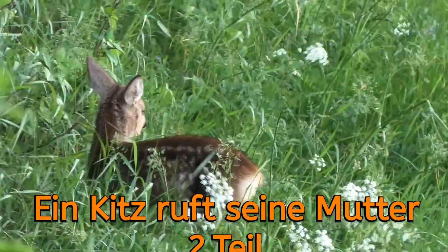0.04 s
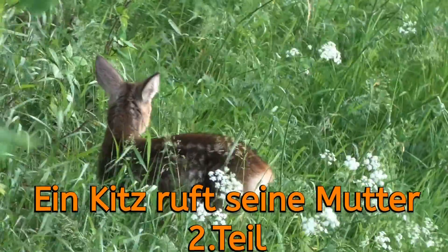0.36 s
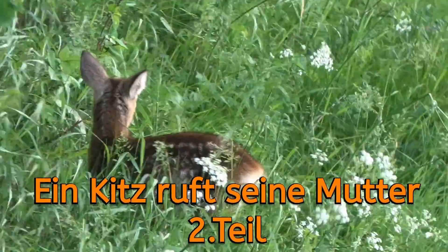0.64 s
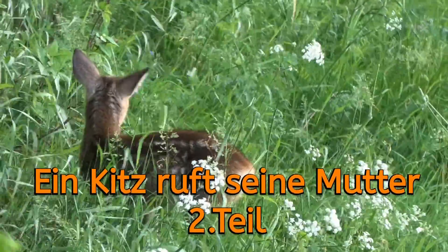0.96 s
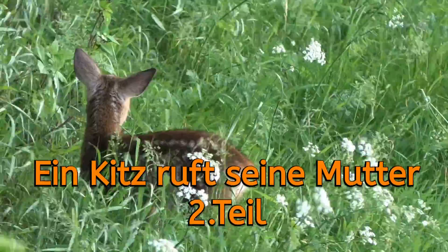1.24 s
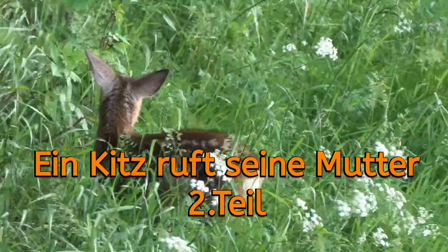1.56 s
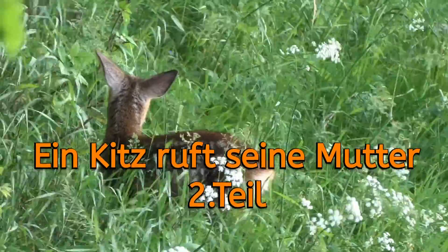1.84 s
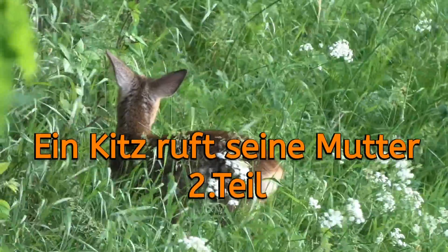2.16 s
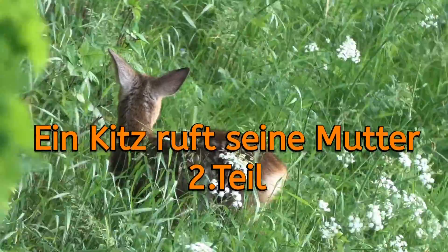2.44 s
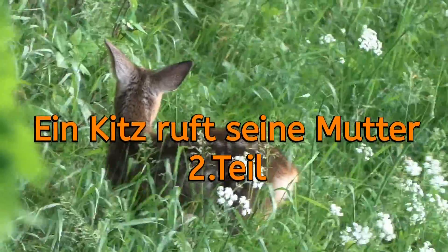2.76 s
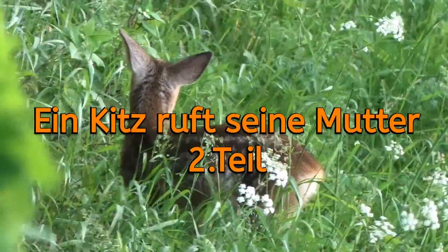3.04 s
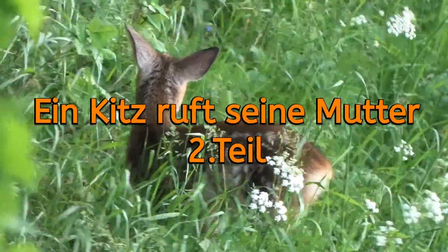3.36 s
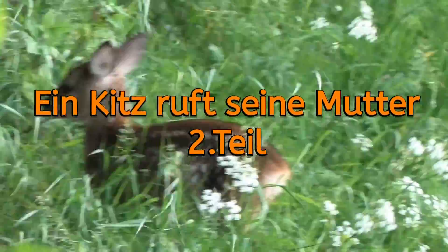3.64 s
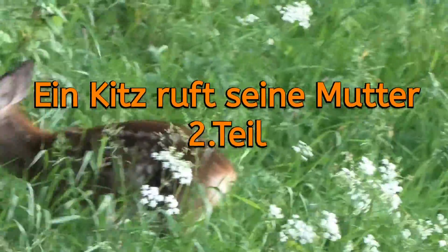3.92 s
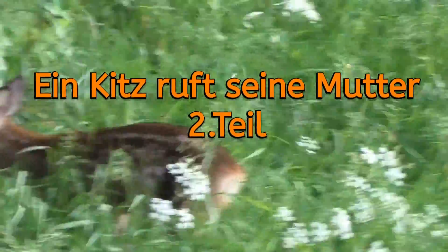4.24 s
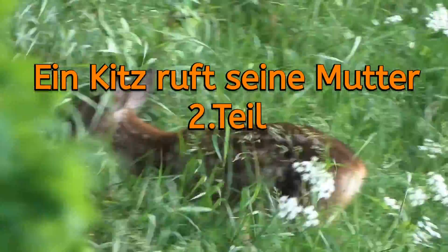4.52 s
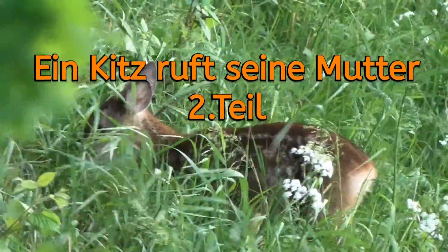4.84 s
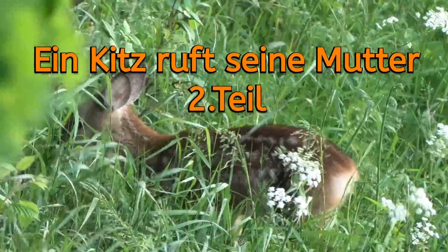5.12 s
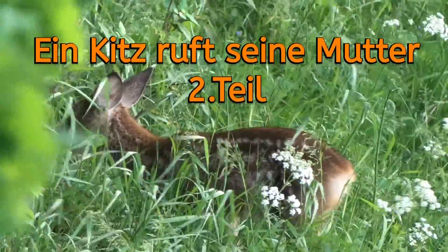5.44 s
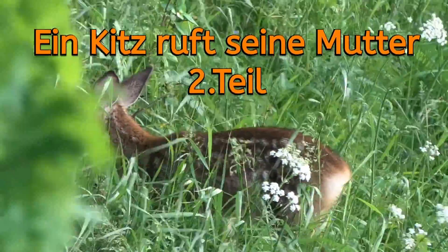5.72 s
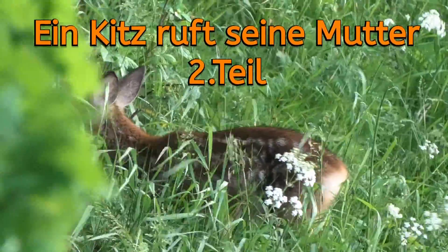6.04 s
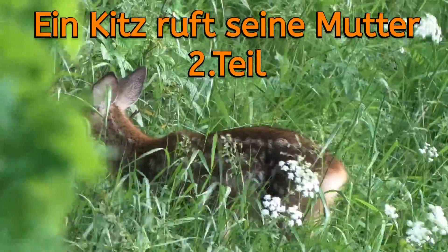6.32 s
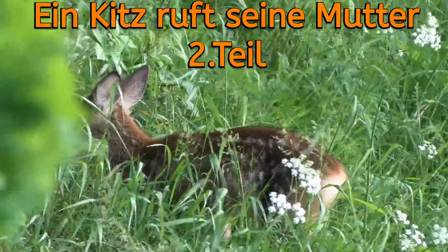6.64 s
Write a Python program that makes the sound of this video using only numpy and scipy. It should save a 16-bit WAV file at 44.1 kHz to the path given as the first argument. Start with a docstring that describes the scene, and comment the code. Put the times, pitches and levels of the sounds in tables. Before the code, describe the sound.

Songbirds whistle quick sweeping notes outdoors, growing busier midway, before a distant fluting bird and a cuckoo call from the woods.

```python
"""Small birds whistle at the edge of a summer meadow, their sweeping notes scattered by the foliage.
From the start light wind buffets the microphone and a camera ticks faintly; later comes one dry click.
Midway a distant chorus swells, quick twitters and near scooping notes begin, and a fawn brushes the grass.
Near the end a fluting bird and a cuckoo call from deep in the wood, which reverberates after them."""
import sys
import numpy as np
from scipy import signal
from scipy.fft import rfft, irfft, next_fast_len
from scipy.io import wavfile
from scipy.ndimage import uniform_filter1d, map_coordinates

SR = 44100
rng = np.random.default_rng(int(sys.argv[2]) if len(sys.argv) > 2 else 0)


def file_out(sig):
    """Save sig as 16-bit WAV at sys.argv[1]."""
    # one column per channel
    cols = np.atleast_2d(sig).T
    # limit, then scale
    lim = np.clip(cols, -1, 1)
    pcm = np.round(lim * 32767).astype(np.int16)
    wavfile.write(sys.argv[1], SR, pcm)


N = 298998
TIME = np.arange(N) / SR

# spectra of camera hiss, distant air, wind on the microphone and far birds: f/Hz, relative level/dB
HISS_SPECTRUM = [(800, 5.5), (2000, 2.5), (5000, -4.5), (8000, -7), (11000, -2.5), (15500, 0.5)]
AIR_SPECTRUM = [(15, -35), (25, -32), (65, -8.5), (99, -2.5), (130, -5.5), (218, -11.5), (413, -7),
                (515, -12.5), (785, -16), (1460, -27.5), (2000, -37.5), (2600, -35.5), (4400, -120)]
BUFFET_SPECTRUM = [(15, -9), (40, 2.5), (90, 3), (150, -10.5), (300, -34.5), (700, -66)]
CHORUS_SPECTRUM = [(1120, -48.5), (1900, -21), (2310, -6.5), (2650, -4), (2910, -1), (3180, 4.5), (3580, 2),
                   (4170, -4), (4920, 0.5), (5840, -11), (7800, -27.5), (10100, -37), (17200, -120)]
# impacts in the camera: t/s, relative tick level/dB, relative thud level/dB
CAMERA_TICKS = [(0.624, -49, -67.5), (1.512, -49.5, -67), (2.41, -55, -64), (3.289, -44.5, -63.5),
                (4.185, -46, -59), (5.0776, -52, -57), (5.9697, -44.5, -64)]
# a dry click: t/s, level/dB
DRY_CLICK = [(2.4542, -39)]
# puffs of wind: t/s, half width/s, relative level/dB
WIND_PUFFS = [(.35, 0.034, -67), (.67, .04, -71), (1.28, 0.14, -57), (2.24, 0.1, -56.5), (5.01, 0.027, -67),
              (6.1, .02, -56)]
# envelopes of the fawn's step and of the far birds: t/s, relative level/dB
STEP_ENVELOPE = [(3.55, -74.5), (3.68, -62.5), (3.77, -63.5), (3.86, -66), (3.95, -74.5)]
CHORUS_ENVELOPE = [(0, -65.5), (1.3, -73.5), (2.1, -64.5), (2.6, -65), (3.1, -57.5), (4.2, -52.5),
                   (5.3, -50), (6, -51), (6.4, -67.5), (6.78, -69)]
# reflections from nearby trunks: delay/s, relative level/dB
TRUNK_ECHOES = [(.0085, -10.5), (.021, -14)]
# contours of the cuckoo's two hoots and the fluting bird's drop and slide: t/s, f/Hz, level/dB
HIGH_HOOT = [(5.75, 725, -71), (5.79, 687.5, -56), (5.845, 679.5, -55.5), (5.88, 684, -77)]
LOW_HOOT = [(6.03, 604.6, -67), (6.07, 580.3, -50.5), (6.12, 552.6, -47.5), (6.17, 548.3, -47.5),
            (6.2, 529, -67)]
FLUTED_DROP = [(5.725, 2230, -62), (5.78, 1423, -47.5), (5.8, 1390, -75)]
FLUTED_SLIDE = [(5.95, 2156, -59.5), (6.01, 1810, -44), (6.08, 1701, -48), (6.14, 1602, -50.5),
                (6.185, 1469, -40), (6.27, 1108, -57), (6.3, 1040, -76)]
# far warbles: t/s, length/s, start f/Hz, end f/Hz, relative level/dB
WARBLE_NOTES = [(0, 0.83, 4720, 5300, -73.5), (0.93, 0.077, 3654, 2917, -49.5),
                (1.076, 0.089, 4860, 5130, -59), (1.258, 0.13, 6050, 6350, -67),
                (1.362, 0.053, 6850, 6630, -57.5), (1.752, 0.088, 4590, 4480, -58.5),
                (2.113, .14, 2290, 2205, -69.5), (2.121, 0.25, 5420, 5550, -68.5),
                (5.891, 0.07, 2316, 2304, -53.5)]
# one bird's evenly repeated falling warble, in the same columns
WARBLE_SERIES = [(4.338 + k * 0.157, 0.08, 3400, 2564, -49) for k in range(6)]
# twitters: t/s, nominal top f/Hz, relative level/dB
TWITTER_NOTES = [(3.672, 5220, -51.5), (3.735, 5170, -51), (3.785, 5200, -49), (3.86, 5110, -46),
                 (3.902, 5100, -46), (3.985, 5030, -47.5), (4.045, 5050, -46), (4.172, 5160, -42),
                 (4.218, 5700, -43.5), (4.282, 5130, -45), (4.46, 4990, -46), (4.618, 5200, -46),
                 (4.772, 5200, -44), (4.908, 5250, -43), (4.936, 5200, -48.5), (5.094, 5200, -48),
                 (5.24, 5080, -52), (5.572, 6400, -47), (5.598, 6120, -50), (5.65, 6410, -50),
                 (6.633, 5300, -50.5)]
# arched or dipped whistles: t/s, length/s, middle f/Hz, f/Hz at both ends, level/dB
BOW_NOTES = [(2.541, 0.12, 2869, 2515, -44.5), (2.929, 0.093, 3786, 3690, -49),
             (3.738, 0.092, 2810, 2675, -56), (4.006, 0.072, 4980, 4750, -56),
             (5.262, 0.098, 2260, 2610, -56), (5.412, 0.079, 2190, 2490, -55),
             (6.122, 0.1, 2760, 2860, -60.5), (6.493, 0.082, 2822, 2710, -67)]
# rising calls: t/s, length/s, top f/Hz, time of the leap/length, level/dB
RISE_NOTES = [(0.188, 0.039, 3260, 0.6, -57.5), (0.504, 0.1, 3220, 0.58, -58.5),
              (3.293, .118, 3090, .38, -43.5), (3.505, 0.11, 3223, 0.41, -44.5)]
# falling slurs: t/s, length/s, start f/Hz, final f/Hz, glide time/s, level/dB, scattered energy share
SLUR_NOTES = [(0.779, 0.039, 3790, 2820, 0.035, -46.5, 0.53), (0.929, 0.097, 3925, 3098, 0.042, -45, 0.26),
              (1.574, .12, 4410, 3350, 0.031, -45, 0.41), (1.908, 0.11, 4410, 3285, 0.043, -45, 0.42),
              (2.241, 0.094, 3390, 3161, 0.047, -45, 0.47), (2.37, 0.084, 6100, 4380, 0.021, -56, 0.74),
              (2.395, 0.082, 3390, 3243, 0.019, -43.5, 0.3), (2.7, 0.043, 6450, 4680, 0.033, -60.5, 0.8),
              (2.764, .132, 4900, 3493, .014, -44, 0.4), (2.978, 0.089, 3945, 3030, 0.0082, -45, 0.24),
              (3.174, 0.038, 4140, 4190, .011, -46, .4), (3.596, 0.084, 5660, 5200, 0.037, -54, 0.54),
              (6.037, 0.06, 4840, 4800, 0.026, -58, .4), (6.145, .067, 4910, 4740, 0.021, -53.5, 0.5),
              (6.283, 0.063, 5000, 4760, 0.0295, -54, .45), (6.42, 0.066, 4990, 4700, 0.0454, -60, .5)]
# two-step plunges: t/s, length/s, frequency ratio, level/dB
PLUNGE_NOTES = [(3.122, 0.053, .93, -46.5), (4.452, 0.18, 0.99, -41), (5.834, .17, 0.97, -41.5),
                (6.19, 0.155, 1.0, -43.5)]
# their common contour: t/s from the onset, nominal f/Hz, relative level/dB, scattered energy share
PLUNGE_CONTOUR = [(0, 7000, -6.5, 0.7), (.013, 5874, -1, 0.76), (.035, 5435, -0.5, 0.58),
                  (.046, 3953, 2.5, 0.25), (.06, 3228, -8.5, 0.36), (0.123, 3280, -13.5, .3),
                  (.152, 4290, -1, 0.25), (.17, 4220, -13, 0)]
# the near bird's scoops: t/s, length/s, held f/Hz, end f/Hz, glide time/s, level/dB, scattered share
SCOOP_NOTES = [(3.472, .072, 4645, 4430, .01, -42, 0.31), (3.815, .088, 4070, 4450, 0.0085, -34.5, 0.08),
               (4.109, .078, 4550, 4500, 0.012, -38, 0.15), (4.819, 0.086, 4070, 4340, 0.011, -35.5, 0.08),
               (5.165, 0.094, 3674, 4180, .013, -41, 0.06), (5.495, 0.075, 4596, 4390, .014, -42, 0.25),
               (6.538, .094, 4050, 4580, .011, -35.5, 0.09)]


def amp(db):
    """Amplitude grows tenfold for every 20 dB."""
    return 10 ** (np.asarray(db) / 20)


def unit(x):
    """Normalisation to rms 1."""
    return x / np.sqrt(np.mean(x ** 2) + 1e-20)


def clock(length):
    """Sampled time in seconds from the onset of a sound."""
    return np.arange(int(length * SR)) / SR


def curves(rows):
    """Linear interpolation of each column over the time in the first."""
    times, *columns = np.transpose(rows)
    return [np.interp(TIME, times, column) for column in columns]


def wobble(rate, size=N):
    """Smooth random fluctuation through `rate` Gaussian values a second."""
    return map_coordinates(rng.standard_normal(int(size * rate / SR) + 4), [np.arange(size) * rate / SR])


def noise(spectrum):
    """Spectral shaping of white noise by (f/Hz, level/dB) points, at rms 1."""
    size = next_fast_len(N + 8192)
    hz, db = np.transpose(spectrum)
    gain = amp(np.interp(np.log(np.fft.rfftfreq(size, 1 / SR) + 1), np.log(hz), db))
    return unit(irfft(rfft(rng.standard_normal(size)) * gain, size)[:N])


def add(track, onset, sound):
    """Superposition of a sound on a track, from an onset in seconds."""
    part = track[max(round(onset * SR), 0):][:len(sound)]
    part += sound[:len(part)]


def whistle(hz, waver, flutter_db):
    """A sinusoid under random frequency and amplitude modulation; phase is the integral of frequency."""
    phase = 2 * np.pi * np.cumsum(hz * (1 + waver * wobble(170, len(hz)))) / SR
    return np.sqrt(2) * np.sin(phase) * amp(flutter_db * wobble(82.8, len(hz)))


def swell(size, crest, sharpness):
    """The envelope of one push of air, peaking at `crest`, a share of the length."""
    progress = np.interp(np.linspace(0, 1, size), [0, crest, 1], [0, .5, 1])
    return np.abs(np.sin(np.pi * progress)) ** sharpness


def reflected(x):
    """Interference: delayed reflections from trunks beat against a gliding direct tone."""
    out = x.copy()
    for delay, db in TRUNK_ECHOES:
        add(out, delay, amp(db) * x)
    return out


def scattered(x, early_t60, late_t60, late_db):
    """Multiple scattering: leaves give a fast decay, trunks a slower one (60 dB times in seconds)."""
    t = clock(1)
    decay = amp(-60 * t / early_t60) + amp(late_db - 60 * t / late_t60)
    decay *= 1 - np.exp(-t / 0.0023)
    decay /= np.sqrt(np.sum(decay ** 2))
    out, hop = np.zeros(N), SR // 8
    padded, window = np.pad(x, (0, 2 * hop)), np.hanning(2 * hop)
    for start in range(0, N, hop):
        piece = padded[start:start + 2 * hop] * window
        paths = rng.standard_normal(SR)  # the paths change as the foliage moves
        if piece.any():
            add(out, start / SR, signal.fftconvolve(piece, decay * paths))
    return out


def camera():
    """Damped impacts: over a steady hiss, each tick of the mechanism excites a thud in the housing."""
    ticks, thuds, t = np.zeros(N), np.zeros(N), clock(0.2)
    for onset, tick_db, thud_db in CAMERA_TICKS:
        add(ticks, onset, amp(tick_db - 9 - 60 * t / 0.019))
        add(thuds, onset, amp(thud_db + 7 - 60 * t / 0.14) * (1 - np.exp(-t / 0.0055)))
    ticks *= noise([(2000, -7), (8000, -5), (15000, -1)])
    thuds *= noise([(50, -7), (160, 2.5), (350, -1.5), (700, -21), (2000, -53)])
    return amp(-72.5) * noise(HISS_SPECTRUM) + ticks + thuds


def wind():
    """Turbulent pressure: a dying breeze and a few puffs buffet the microphone, over distant air."""
    breeze = amp(-74.5 - 1.33 * TIME)
    puffs = sum(amp(db) * np.exp(-((TIME - peak) / width) ** 2) for peak, width, db in WIND_PUFFS)
    buffets = (breeze + puffs) * amp(-0.5 + 4.1 * wobble(21.96)) * noise(BUFFET_SPECTRUM)
    return buffets + amp(-69.5) * noise(AIR_SPECTRUM)


def fawn_step():
    """Friction: blades of grass brushed by a fawn give a brief swell of high noise."""
    level_db, = curves(STEP_ENVELOPE)
    blades = noise([(1500, -9.5), (5000, 3.5), (9000, -6.5), (15000, -23)])
    return amp(level_db + wobble(120)) * blades


def click():
    """A heavily damped transient: noise that dies away without ringing."""
    envelope = np.zeros(N)
    for onset, db in DRY_CLICK:
        add(envelope, onset, amp(db - 60 * clock(0.05) / 0.014))
    return envelope * noise([(300, -2), (1200, -25), (3500, 13), (5500, -15), (15000, -37)])


def chorus():
    """Incoherent summation: many far songs blur into a flickering band of noise."""
    level_db, = curves(CHORUS_ENVELOPE)
    spectrogram = signal.stft(noise(CHORUS_SPECTRUM), nperseg=512)[2]
    patches = uniform_filter1d(rng.standard_normal(spectrogram.shape), size=4, axis=0)  # in frequency
    patches = unit(uniform_filter1d(patches, size=10, axis=1))  # in time
    blur = signal.istft(spectrogram * amp(5.04 * patches), nperseg=512)[1][:N]
    return amp(level_db - 5) * unit(blur)


def wood_call(contour, share, waver, t60):
    """Reverberation: a share of a pure call's energy arrives diffusely through the trees."""
    hz, level_db = curves(contour)
    sounding = (TIME > contour[0][0]) & (TIME < contour[-1][0])
    call = sounding * amp(level_db) * whistle(uniform_filter1d(hz, size=600), waver, flutter_db=3.5)
    diffuse = scattered(call, early_t60=0.84, late_t60=t60, late_db=4)
    return np.sqrt(1 - share) * call + np.sqrt(share) * diffuse


def cuckoo(echo_s=0.19, echo_db=-4):
    """Echo: a soft high hoot returns from the trees before the stronger low hoot."""
    high = wood_call(HIGH_HOOT, share=0.53, waver=0.0148, t60=2.3)
    call = high + wood_call(LOW_HOOT, share=0.099, waver=0.0055, t60=2.6)
    add(call, echo_s, amp(echo_db) * high)
    return call


def fluting_bird():
    """Two falling glides from so deep in the wood that reverberation carries much of their energy."""
    drop = wood_call(FLUTED_DROP, share=0.78, waver=0.0095, t60=1.6)
    return drop + wood_call(FLUTED_SLIDE, share=0.51, waver=0.0088, t60=1.09)


def warblers(shake_hz=95, depth=0.047):
    """Frequency modulation: the pitch of each far note shakes rapidly about a straight glide."""
    song = np.zeros(N)
    for onset, length, start_hz, end_hz, db in WARBLE_NOTES + WARBLE_SERIES:
        size = int(length * SR)
        shake = np.sin(2 * np.pi * np.cumsum(shake_hz * (1 + 0.31 * wobble(60, size))) / SR)
        hz = np.linspace(start_hz, end_hz, size) * (1 + depth * shake)
        tone = whistle(hz, waver=0.015, flutter_db=2)
        add(song, onset, amp(db) * swell(size, crest=0.14, sharpness=0.72) * tone)
    return amp(-3.5) * song + amp(-1) * scattered(song, early_t60=0.75, late_t60=1, late_db=-1)


def twitterer(length_s=0.033, top_s=0.00828, width_s=0.011, foot_ratio=0.67):
    """A train of short tone pulses, each a Gaussian arch in frequency, slightly detuned at random."""
    song, t = np.zeros(N), clock(length_s)
    arch = foot_ratio + (1 - foot_ratio) * np.exp(-((t - top_s) / width_s) ** 2)
    for onset, top_hz, db in TWITTER_NOTES:
        detuning = 1 + 0.0221 * rng.standard_normal()
        tone = whistle(top_hz * arch * detuning, waver=0.016, flutter_db=0)
        add(song, onset, amp(db) * swell(len(t), crest=0.71, sharpness=1.65) * tone)
    return amp(-1) * reflected(song) + amp(2.5) * scattered(song, early_t60=0.29, late_t60=1.5, late_db=-8.5)


def bows(share=0.29):
    """Parabolic sweep: the frequency leaves its starting value and returns to it."""
    for onset, length, middle_hz, ends_hz, db in BOW_NOTES:
        parabola = (2 * clock(length) / length - 1) ** 2
        yield onset, middle_hz + (ends_hz - middle_hz) * parabola, db, share


def rises(foot_hz=2678, leap_width=0.126, share=0.37):
    """Smoothed frequency step: a low whistle leaps to a higher one."""
    for onset, length, top_hz, place, db in RISE_NOTES:
        leap = (1 + np.tanh((clock(length) / length - place) / leap_width)) / 2
        yield onset, foot_hz + (top_hz - foot_hz) * leap, db, share


def slurs():
    """Relaxation: the frequency glides quickly, then settles towards its final value."""
    for onset, length, start_hz, end_hz, glide, db, share in SLUR_NOTES:
        remaining = np.exp(-(clock(length) / glide) ** 1.402)
        yield onset, end_hz + (start_hz - end_hz) * remaining, db, share


def plunges(release_s=0.0087):
    """Piecewise sweep: two steps down, a hold and an upturn, cut to length; direct and diffuse parts."""
    direct, diffuse = np.zeros(N), np.zeros(N)
    knots, *contour = np.transpose(PLUNGE_CONTOUR)
    for onset, length, ratio, db in PLUNGE_NOTES:
        t = clock(length)
        hz, contour_db, share = [np.interp(t, knots, column) for column in contour]
        release = np.minimum((length - t) / release_s, 1)
        tone = whistle(ratio * uniform_filter1d(hz, size=250), waver=0.0077, flutter_db=0.1)
        note = amp(db + contour_db) * release * tone
        share = np.clip(share, .01, .99)
        add(direct, onset, np.sqrt(1 - share) * note)
        add(diffuse, onset, np.sqrt(share) * note)
    return direct, diffuse


def scoops(top_hz=6750):
    """Downward chirp: the frequency drops steeply, holds, and bends at the end."""
    for onset, length, held_hz, end_hz, glide, db, share in SCOOP_NOTES:
        t = clock(length)
        drop = (top_hz - held_hz) * np.exp(-(t / glide) ** 1.496)
        bend = (end_hz - held_hz) * (t / length) ** 7
        yield onset, held_hz + drop + bend, db, share


def songbirds():
    """Direct and diffuse fields: the farther the bird, the greater the scattered share of its note."""
    direct, diffuse = plunges()
    for onset, hz, db, share in [*scoops(), *slurs(), *rises(), *bows()]:
        note = amp(db) * whistle(hz, waver=0.0063, flutter_db=1.5)
        add(direct, onset, np.sqrt(1 - share) * swell(len(hz), crest=0.63, sharpness=0.9) * note)
        # leaves catch the high opening of a note, so the scattered part crests earlier
        add(diffuse, onset, np.sqrt(share) * swell(len(hz), crest=0.31, sharpness=0.25) * note)
    return reflected(direct) + scattered(diffuse, early_t60=0.36, late_t60=1, late_db=-3.5)


def scene():
    """Superposition: the pressures of all sources add at one microphone."""
    birds = fluting_bird() + songbirds() + warblers() + twitterer() + cuckoo() + chorus()
    return (birds + wind() + fawn_step() + click() + camera())[None]


def record(dry, cutoff_hz=15800):
    """Band limiting: an ideal low-pass filter removes everything above the cutoff."""
    size = next_fast_len(N + 8192)
    passband = np.fft.rfftfreq(size, 1 / SR) < cutoff_hz
    return irfft(rfft(dry, size) * passband, size)[..., :N]


dry = scene()
out = record(dry)
file_out(out)
```